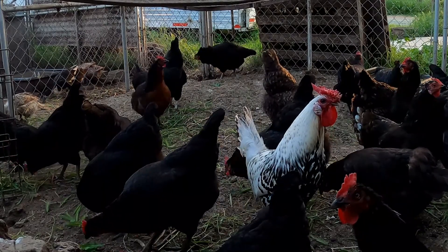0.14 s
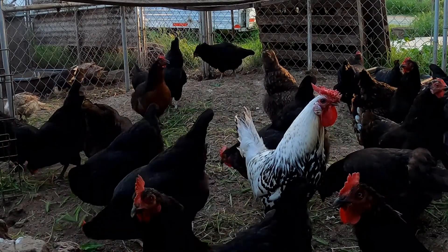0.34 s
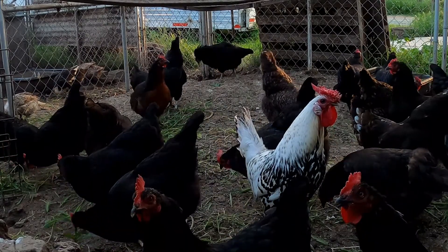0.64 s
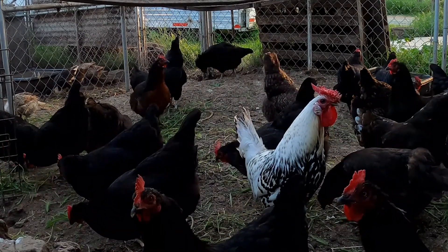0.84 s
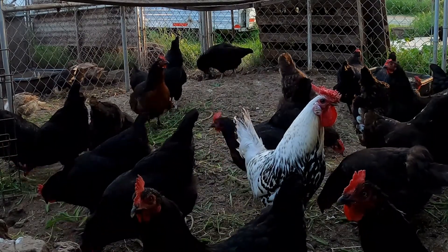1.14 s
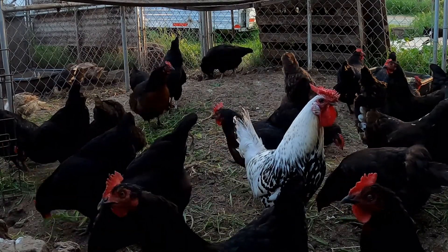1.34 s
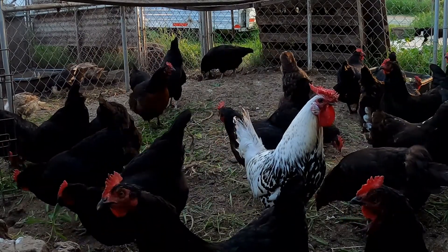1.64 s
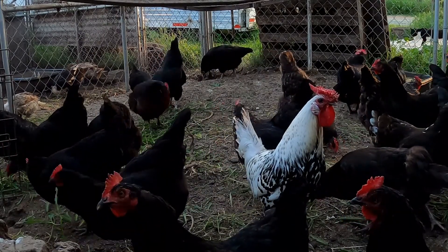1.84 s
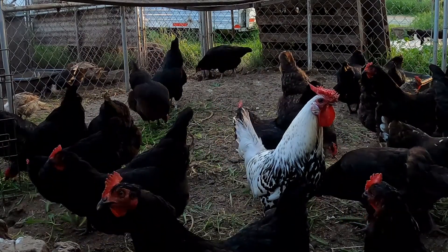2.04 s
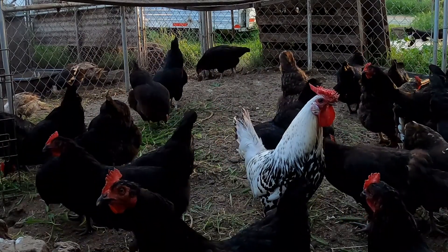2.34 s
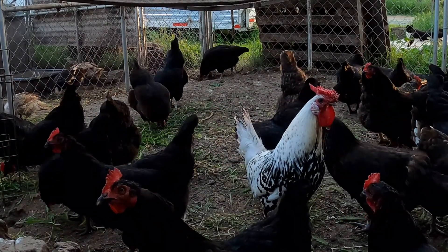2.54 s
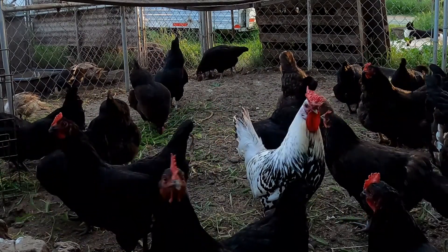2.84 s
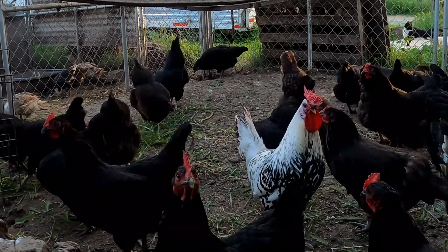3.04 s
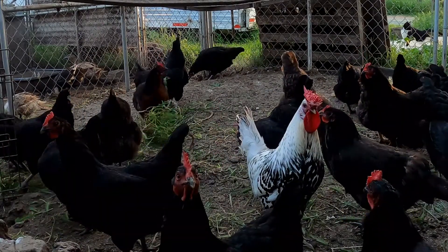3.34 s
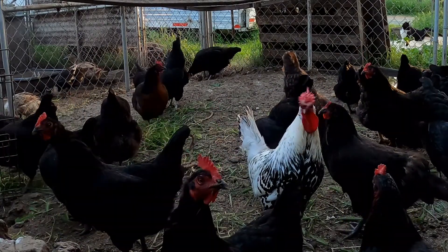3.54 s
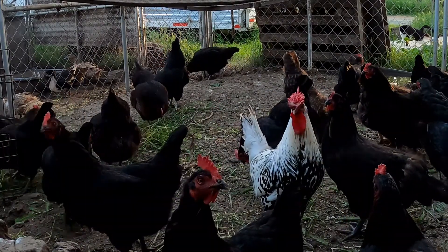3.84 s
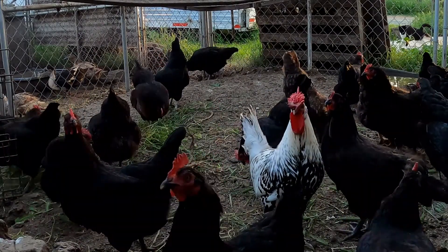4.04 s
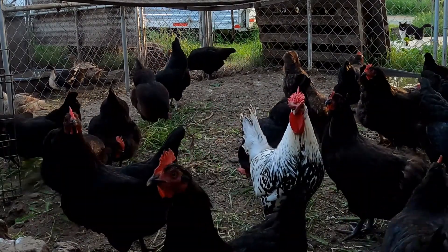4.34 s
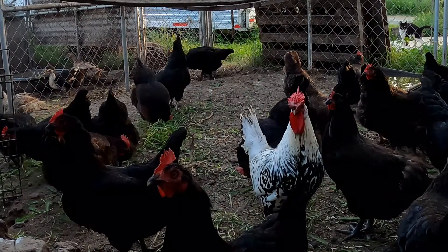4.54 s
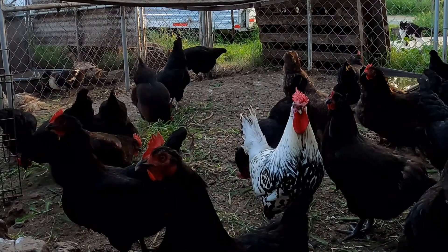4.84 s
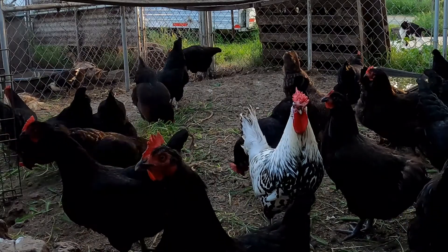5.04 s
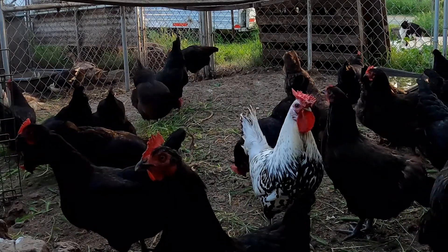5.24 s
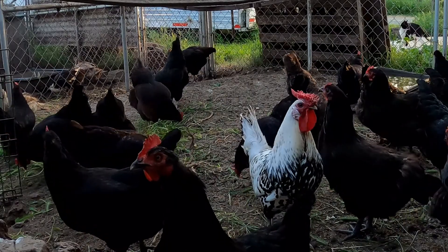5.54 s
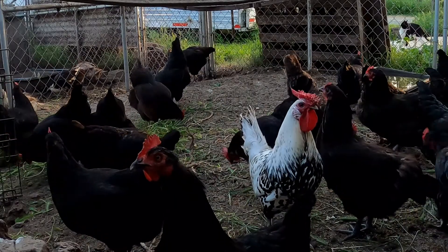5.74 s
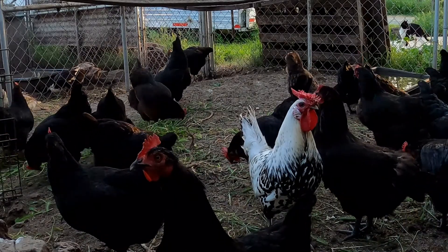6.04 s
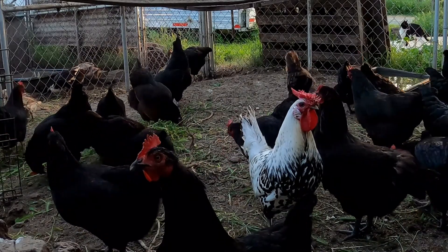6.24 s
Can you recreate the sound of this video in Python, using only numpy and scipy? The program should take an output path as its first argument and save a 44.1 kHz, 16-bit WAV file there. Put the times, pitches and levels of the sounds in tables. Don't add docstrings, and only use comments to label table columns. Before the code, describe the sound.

An outdoor chicken pen heard through a nearby stereo microphone, with quiet far traffic, deep soft wind gusts and thin, high cricket chirps pulsing about three times a second throughout. At 0 s a hen is already moaning; the nasal tone rises slightly, swells around 0.6 s, turns rough and breaks off at about 0.8 s. Small straw snaps accompany it. From 1.3 to 2.5 s, claws drag through dry earth and beaks peck, with crisp crackles near 2 s. A quieter stretch follows. Three short dry clucks sound at roughly 3.4, 3.6 and 3.8 s, each stronger. After straw rustle and a peck at 4.3 s, a loud, harsh, very short bawk bursts out at 4.55 s, slightly left, with a brief reflection from the shed walls. From 5 s to the end near 6.4 s, only light pecks, snapping stalks, shuffling and a soft footfall at 6.2 s remain.

```python
import sys
import numpy as np
from scipy import signal
from scipy.fft import rfft, irfft, next_fast_len
from scipy.io import wavfile

SR = 44100
rng = np.random.default_rng(int(sys.argv[2]) if len(sys.argv) > 2 else 0)


def master_out(mix):
    frames = np.transpose(np.atleast_2d(mix))
    ceiling = np.clip(frames, -1, 1)
    pcm = np.round(ceiling * 32767).astype(np.int16)
    wavfile.write(sys.argv[1], SR, pcm)


def level_to_linear(level):
    exponent = np.asarray(level, float) / 20
    return 10 ** exponent


N = 281358

# (frequency [Hz], level [dB])
AIR_TONE = [(90, -8), (136, -6), (225, -7), (300, -17), (450, -21), (800, -31), (1270, -24.5), (3260, -29),
            (5530, -30), (8400, -34), (10000, -68), (15500, -80)]
# (frequency [Hz], likeness [0 to 1])
LIKENESS = [(30, .92), (90, .88), (180, .5), (500, .7), (1500, .5), (4000, .25), (12000, .15)]
# (frequency [Hz], level [dB per Hz])
WIND_TONE = [(22, -5), (42, -3.5), (60, 3), (85, -7), (130, -16)]
# (time [s], hold [s], level [dB])
GUSTS = [(0, .03, -59), (.16, .03, -59), (.4, .1, -53), (.66, .04, -57), (.95, .15, -56), (1.2, .08, -54),
         (1.6, .1, -60), (1.9, .1, -60), (2.22, .2, -52), (2.7, .1, -53), (2.95, .3, -55), (3.62, .45, -58),
         (4.3, .25, -58), (4.83, .06, -56), (5.22, .3, -57), (5.73, .1, -54), (5.95, .2, -59)]
# (start [s], end [s], level [dB])
CRICKET_CHIRPS = [(.12, .22, -67), (.52, .64, -67), (.8, .9, -67), (1.57, 1.68, -67), (1.82, 1.95, -65),
                  (2.11, 2.23, -65), (2.52, 2.63, -66), (2.78, 2.87, -65), (3.05, 3.17, -64),
                  (3.29, 3.41, -64), (3.6, 3.74, -66), (3.99, 4.1, -66), (4.29, 4.43, -67),
                  (4.62, 4.7, -66), (4.86, 4.96, -67), (5.15, 5.26, -66), (5.42, 5.55, -65),
                  (5.72, 5.84, -64), (5.98, 6.08, -63), (6.26, 6.38, -63)]
# (start [s], end [s], frequency [Hz], width [Hz], level [dB])
FAR_INSECTS = [(1.32, 1.38, 5060, 70, -66), (1.47, 1.98, 5000, 80, -65), (2.0, 2.5, 4990, 90, -67.5),
               (.95, 1.15, 4830, 120, -75), (2.52, 2.76, 4830, 150, -77), (3.04, 3.14, 4980, 120, -69),
               (3.03, 3.15, 5400, 500, -71), (3.4, 3.47, 3350, 120, -67), (3.53, 3.72, 5250, 200, -70),
               (3.18, 3.36, 2150, 150, -73), (3.57, 3.72, 2170, 110, -72), (3.82, 4.03, 2140, 110, -70),
               (4.08, 4.2, 2050, 250, -72), (3.82, 4.02, 3850, 800, -67), (0, 6.38, 4250, 350, -78),
               (2.22, 2.3, 2900, 80, -72), (2.51, 2.6, 2850, 80, -73), (2.78, 2.9, 2850, 80, -74)]
# (time [s], hold [s], dull shuffle level [dB], bright crackle level [dB])
STIRS = [(0, .02, -75, -76), (.3, .04, -72, -73), (.62, .03, -75, -73), (.82, .03, -75, -79),
         (1.31, .02, -62, -72), (1.42, .03, -65, -72), (1.6, .06, -70, -71), (1.73, .08, -63, -70),
         (1.86, .03, -65, -68), (1.99, .1, -64, -70), (1.955, .01, -66, -58), (2.075, .02, -66, -58),
         (2.125, .012, -61, -72), (2.33, .1, -63, -71), (2.2, .06, -72, -74), (3.0, .08, -86, -76),
         (3.27, .16, -66, -66), (3.555, .1, -65, -67), (3.775, .1, -67, -72), (4.04, .13, -64, -61),
         (4.315, .015, -56, -65), (4.38, .08, -67, -68), (4.55, .04, -61, -63), (5.015, .01, -80, -68),
         (5.2, .06, -75, -73), (5.32, .03, -72, -67), (5.395, .02, -64, -75), (5.422, .012, -68, -60),
         (5.53, .015, -64, -61), (5.604, .015, -65, -64), (5.76, .03, -62, -64), (5.86, .17, -64, -65),
         (6.17, .2, -68, -80), (.55, .06, -80, -72), (.17, .04, -78, -74)]
# (frequency [Hz], level [dB per Hz])
SHUFFLE_TONE = [(700, -22), (1100, -3), (1800, -3), (2600, 0), (3800, -2), (5500, -8), (8000, -20)]
# (frequency [Hz], level [dB per Hz])
CRACKLE_TONE = [(2800, -15), (4000, -3), (5500, 0), (8350, -4), (10500, -15), (12400, -14), (15500, -38)]
# (time [s], peak level [dB], centre [Hz], left-right [dB])
SNAPS = [(0.1585, -59, 5460, -0.5), (0.2648, -53, 7850, 0.0), (0.3257, -48, 5700, 0.0),
         (0.625, -53, 7140, -0.5), (1.0016, -60, 8650, 0.0), (1.2414, -55, 5980, 2.0),
         (1.516, -51, 5890, 0.0), (1.5953, -51, 5670, -1.5), (1.6327, -51, 6310, 0.5),
         (1.9535, -40, 5900, 1.0), (2.0762, -38, 5730, -0.5), (2.9657, -58, 6770, -2.5),
         (3.0011, -58, 5670, -0.5), (4.0322, -51, 6320, -0.5), (4.0457, -49, 6080, 0.0),
         (5.0155, -51, 7800, 1.5), (5.3078, -54, 5990, 0.0), (5.3433, -49, 8390, 0.5),
         (5.4144, -46, 5990, 1.5), (5.5348, -49, 5690, 4.0), (5.6052, -46, 7790, 1.0),
         (5.7613, -47, 6240, 2.0), (5.8511, -47, 7910, 1.0), (6.1384, -56, 5470, 2.0),
         (6.3415, -51, 5520, -0.5)]
# (time [s], peak level [dB], centre [Hz], left-right [dB])
PECKS = [(0.0458, -38, 1670, 0.0), (0.08, -48, 2500, 0.0), (0.3257, -50, 3000, 0.0),
         (0.878, -52, 1120, -1.0), (4.3211, -42, 1700, 0.0), (1.3099, -41, 3160, 4.0),
         (1.3763, -54, 2080, 2.5), (1.4122, -46, 3110, 2.5), (1.722, -49, 2750, -1.0),
         (1.7659, -50, 2510, -2.0), (1.8084, -51, 1620, -1.0), (1.8534, -48, 2080, 2.0),
         (1.938, -43, 2250, 3.0), (2.0318, -45, 2840, 2.0), (2.1164, -43, 2240, 2.5),
         (2.3092, -51, 2180, -0.5), (2.3484, -49, 2430, -1.5), (2.4379, -51, 2760, 1.5),
         (2.4713, -52, 3640, 2.5), (3.2355, -56, 1380, 1.5), (3.4665, -50, 3520, -1.5),
         (4.2722, -54, 2010, 1.0), (4.3211, -37.5, 2940, -0.5), (4.3445, -41, 2090, -1.0),
         (4.4034, -45, 2200, 3.5), (4.4977, -54, 2910, 3.5), (5.3916, -52, 3430, 5.5),
         (5.4144, -51, 3860, 4.0), (5.6052, -50, 2850, 0.0), (5.7588, -45, 3590, 4.0),
         (5.8511, -46, 3560, 5.5), (5.9973, -51, 3300, 4.0), (6.0834, -54, 2460, 3.5),
         (6.1154, -47, 3100, 3.5)]
# (time [s], peak level [dB], centre [Hz], left-right [dB])
TICKS = [(1.0016, -60, 8650, -0.5), (1.3094, -57, 8000, 1.0), (1.4127, -57, 7260, -1.5),
         (1.5958, -50, 8170, -3.0), (1.9495, -52, 8100, -2.0), (1.9574, -49, 7000, 0.5),
         (2.0727, -53, 7030, -3.0), (2.0807, -50, 8670, -0.5), (2.6808, -61, 8130, -1.0),
         (3.483, -59, 9810, -0.5), (4.0322, -50, 8260, -0.5), (4.3211, -54, 7270, -1.5),
         (4.7197, -60, 7690, 2.0), (4.7341, -57, 7900, 0.5), (4.7805, -53, 6890, 1.5),
         (4.8065, -61, 6200, 0.5), (4.8389, -58, 5600, 0.5), (4.8389, -60, 2900, 0.5),
         (4.9492, -58, 7740, 0.5), (4.3177, -45, 2150, -2.5), (4.8843, -63, 8070, 0.0),
         (5.0155, -52, 7800, 1.0), (5.3433, -48, 8390, -0.5), (5.3921, -58, 7880, 0.0),
         (5.4196, -53, 7000, 0.5), (5.5214, -56, 7000, 1.0), (5.6052, -49, 7790, 1.0),
         (5.7503, -59, 7250, 0.0), (5.8516, -49, 7910, 0.5), (6.2941, -63, 8450, -0.5)]
# (time [s], peak level [dB], centre [Hz], left-right [dB])
SCUFFS = [(1.715, -50, 2700, -1.0), (1.72, -52, 1350, -1.0), (1.76, -50, 2550, -2.0),
          (1.775, -51, 1400, -1.0), (1.85, -50, 2850, 2.0), (1.938, -46, 2300, 3.0),
          (1.985, -52, 2400, 2.0), (2.03, -46, 2550, 2.0), (2.117, -46, 2350, 2.5), (2.33, -51, 1300, -0.5),
          (2.36, -52, 1250, -0.5), (2.345, -51, 2450, -1.5), (2.435, -53, 2500, 1.5),
          (1.325, -50, 3200, 4.0)]
# (time [s], peak level [dB], centre [Hz], left-right [dB])
THUD = [
    (6.196, -48, 330, 0),
]
# (time [s], pitch [Hz], level [dB])
MOAN = [
    (0.0, 370, -43.5),
    (0.384, 399.9, -39),
    (0.436, 410.6, -39),
    (0.494, 410.5, -37),
    (0.584, 426.6, -36),
    (0.692, 419.0, -36),
    (0.72, 418.6, -37),
    (0.814, 416.7, -38),
    (0.835, 420.6, -46),
]
# (time [s], half-pitch lines level [dB], rasp level [dB])
BREAK_UP = [
    (0, -26, -15),
    (.14, -22, -11),
    (.3, -18, -9),
    (.42, -11, -11),
    (.54, -8, -14),
    (.58, -5, -23),
    (.66, -6, -23),
    (.7, -10, -10),
    (.76, -7.5, -17),
]
# (frequency [Hz], level [dB])
MOAN_TONE = [(380, 0), (800, -23), (1130, -5), (1260, -9.5), (1650, -33), (2100, -25), (2600, -33),
             (3300, -27), (4200, -42)]
# (frequency [Hz], width [Hz], level [dB])
MOAN_PIPE = [(1040, 150, 0), (1500, 260, -13), (630, 150, -19), (3280, 450, -15), (2100, 500, -23),
             (4700, 600, -16), (6600, 400, -11)]
# (time [s], pulses [count], first gap [ms], last gap [ms], peak level [dB])
CLUCKS = [
    (3.3723, 3, 6.9, 6.4, -27.5),
    (3.5795, 3, 5.6, 6.5, -24),
    (3.7891, 4, 5.0, 5.5, -22.5),
]
# (frequency [Hz], width [Hz], level [dB])
CLUCK_THROAT = [(185, 70, -15), (580, 160, -8), (800, 160, -10), (1100, 110, -6), (1500, 220, -9),
                (2400, 600, -14), (3190, 220, -3), (4550, 220, -12)]
OPENING = (0.1, 0.4, 0.3, 1.2, -.5, -1.5, -.6, -.6)
# time [s], pulses [count], gap [ms], stumble [ms], peak level [dB]
BAWK = (4.5575, 10, 3.98, 1.2, -15.5)
# (frequency [Hz], width [Hz], level [dB])
BAWK_THROAT = [(237, 50, -24.5), (520, 120, -34), (760, 120, -33), (1030, 130, -22), (1600, 150, -5.5),
               (2060, 210, -2.5), (2850, 400, -9), (3850, 260, -12), (5100, 700, -6), (6600, 700, -6),
               (8200, 1500, 0), (11000, 2000, -2)]

LEFT_LAG = 2


def rms_one(x):
    return x / np.sqrt(np.mean(x ** 2) + 1e-20)


def at_hz(points, hz):
    return np.interp(np.log(hz), np.log(np.array(points)[:, 0]), np.array(points)[:, 1])


def drift(rate, size=N, db=None):
    step = 40
    r = np.exp(-2 * np.pi * rate * step / SR)
    slow = signal.lfilter([1], [1, -2 * r, r * r], rng.standard_normal(size // step + 2002))[2000:]
    slow = rms_one(slow - slow.mean())
    return np.interp(np.arange(size) / step, np.arange(len(slow)), slow if db is None else level_to_linear(db * slow))


def swells(rows, rest_db, rise_s, fall_s, slur):
    t = np.arange(0, N + 64, 64) / SR
    power = level_to_linear(2 * rest_db)
    for s, hold, db in rows:
        before = (s - t) / (rise_s + slur * hold)
        after = (t - s - hold) / (fall_s + slur * hold)
        power = power + level_to_linear(2 * (db - 20 * np.clip(np.maximum(before, after), 0, 9)))
    return np.interp(np.arange(N) / SR, t, np.sqrt(power))


def resonance(x, hz, width_hz):
    r = np.exp(-np.pi * width_hz / SR)
    top = (1 - r * r) / 2 * np.array([1, 0, -1])
    return signal.lfilter(top, [1, -2 * r * np.cos(2 * np.pi * hz / SR), r * r], x + 1e-18)


def soften(x, cut_hz):
    return signal.sosfilt(signal.butter(2, cut_hz, fs=SR, output="sos"), x + 1e-18)


def placed(x, pan_db):
    late = np.concatenate([np.zeros(LEFT_LAG), x[:-LEFT_LAG]])
    return np.array([late * level_to_linear(pan_db / 2), x * level_to_linear(-pan_db / 2)])


def banded_noise(spectrum, patchy_db, grain_db):
    out = np.zeros((3, N))
    edges = 20 * 2 ** np.arange(0, 10, .5)
    white = rng.standard_normal((2, 2, N)) * drift(150., db=grain_db) * drift(3., db=.6 * patchy_db)
    for k, (low, high) in enumerate(zip(edges, edges[1:])):
        hz = np.sqrt(low * high)
        if spectrum[0][0] < hz * 1.3 < spectrum[-1][0] * 1.5:
            band = signal.sosfilt(signal.butter(2, [low, high], "band", fs=SR, output="sos"), white[k % 2])
            alike = np.clip(at_hz(LIKENESS, hz), 0, 1)
            gain = level_to_linear(at_hz(spectrum, hz)) * drift(10., db=patchy_db)
            mid, side = gain * np.sqrt([[1 + alike], [1 - alike]]) * band
            out += [np.roll(mid, LEFT_LAG * (hz < 3000)), mid, side]
    return rms_one(np.array([out[0] + out[2], out[1] - out[2]]))


def open_air():
    return level_to_linear(-63) * banded_noise(AIR_TONE, patchy_db=1.5, grain_db=.3)


def wind():
    gusts = swells(GUSTS, rest_db=-67, rise_s=.12, fall_s=.12, slur=.2)
    return gusts * level_to_linear(1.2) * banded_noise(WIND_TONE, patchy_db=1.5, grain_db=.3)


def insects():
    near_throbs, far_throbs, throb_depth = 54, 25, .3
    rise_hz, fade_s, swell_db = 55, .018, 2.5
    out = np.zeros((2, N))
    hiss = rng.standard_normal((2, N))
    strokes = []
    for start, end, db in CRICKET_CHIRPS:
        strokes.append((start, end, 4520, 140, db - 2.2, near_throbs, rise_hz))
        strokes.append((start - .02, end, 4270, 200, db - 6.5, near_throbs, rise_hz))
    strokes += [(*row, far_throbs, 0) for row in FAR_INSECTS]
    for start, end, hz, width_hz, db, throbs, bend_hz in strokes:
        at = np.arange(max(round((start - .03) * SR), 0), min(round((end + .03) * SR), N))
        t = at / SR
        tone = resonance(resonance(hiss[:, at], hz, width_hz), hz, width_hz)
        along = (t - (start + end) / 2) / (end - start)
        bend = np.exp(2j * np.pi * np.cumsum(bend_hz * along) / SR)
        tone = (signal.hilbert(tone, next_fast_len(len(at)))[:, :len(at)] * bend).real
        beat = 1 + throb_depth * np.sin(2 * np.pi * throbs * t)
        fade = np.clip(np.minimum(t - start, end - t) / fade_s + 1, 0, 1)
        fade *= level_to_linear(swell_db * (np.clip((t - start) / (end - start), 0, 1) - .6))
        out[:, at] += level_to_linear(db) * fade * rms_one((tone[0] + .6 * tone[1] * [[1], [-1]]) * beat)
    return out


def straw():
    stirs = np.array(STIRS)
    dull = swells(stirs[:, [0, 1, 2]], rest_db=-86, rise_s=.015, fall_s=.04, slur=.5)
    bright = swells(stirs[:, [0, 1, 3]], rest_db=-91, rise_s=.015, fall_s=.04, slur=.5)
    shuffle = dull * banded_noise(SHUFFLE_TONE, patchy_db=3.0, grain_db=2.5)
    crackle = bright * banded_noise(CRACKLE_TONE, patchy_db=2.5, grain_db=2.5)
    return shuffle + level_to_linear(-2.5 * np.array([[.5], [-.5]])) * crackle


def scratches(rows, decay_s, sharpness, click_db, rise_s):
    out = np.zeros((2, N + SR))
    t = np.arange(SR // 10) / SR
    for s, db, hz, pan_db in rows:
        grit = rng.standard_normal((2, len(t)))
        grit = (grit[0] + .6 * grit[1] * [[1], [-1]]) * np.minimum(t / rise_s + .3, 1)
        grit[:, 0] += level_to_linear(click_db)
        decay = decay_s * level_to_linear(.3 * (db + 50))
        burst = grit * level_to_linear(-60 * np.maximum(t - rise_s, 0) / decay)
        burst = resonance(resonance(burst, hz, hz / sharpness), hz, 1.5 * hz / sharpness)
        at = round(s * SR)
        sides = level_to_linear(db + np.array([[pan_db / 2], [-pan_db / 2]]))
        out[:, at:at + len(t)] += burst / np.abs(burst).max() * sides
    return out[:, :N]


def feet_and_beaks():
    out = scratches(SNAPS, .035, sharpness=3.3, click_db=12, rise_s=.004)
    out += level_to_linear(-.7) * scratches(PECKS, .035, sharpness=3.4, click_db=16, rise_s=.002)
    out += level_to_linear(-1.5) * scratches(TICKS, .01, sharpness=2.5, click_db=18, rise_s=.0003)
    out += level_to_linear(-1.5) * scratches(SCUFFS, .11, sharpness=2.8, click_db=3.0, rise_s=.018)
    return out + scratches(THUD, .08, sharpness=1.5, click_db=12, rise_s=.004)


def yard(x):
    t60_s, wall_cut_hz, wall_leak_hz = .28, 6000, 450
    echo_s = np.geomspace(.006, .055, 12) * rng.uniform(.9, 1.1, 12)
    size = next_fast_len(N + SR)
    hz = np.arange(size // 2 + 1) * SR / size
    sound = rfft(x, size) * hz ** 2 / (hz ** 2 + wall_leak_hz ** 2)
    out = np.zeros((2, len(hz)), complex)
    for k, lag in enumerate(echo_s):
        loop = level_to_linear(-60 * lag / t60_s) * np.exp(-2j * np.pi * hz * lag) / (1 + 1j * hz / wall_cut_hz)
        out[k % 2] += loop / (1 - loop) * (-1) ** (k // 2)
    return irfft(out * sound, size)[:, :N]


def throat(pulses, modes, flip=-1):
    pulses = pulses + 1e-9 * rng.standard_normal(len(pulses))
    out = 0
    for k, (hz, width, db) in enumerate(modes):
        out = out + flip ** k * level_to_linear(db) * SR / (np.pi * width) * resonance(pulses, hz, width)
    return out


def breathy(pulses, decay_s, breath_db):
    tail = np.exp(-np.arange(SR // 10) / (decay_s * SR))
    puff = signal.oaconvolve(np.abs(pulses), tail)[:len(pulses)]
    return pulses + level_to_linear(breath_db) * puff * rng.standard_normal(len(pulses))


def moan():
    t = np.arange(SR) / SR
    s, pitches, levels = np.transpose(MOAN)
    pitch, level_db = np.interp(t, s, pitches), np.interp(t, s, levels)
    s, halves, rasps = np.transpose(BREAK_UP)
    halves_db, rasp_db = np.interp(t, s, halves), np.interp(t, s, rasps)
    upper_db = np.interp(level_db, [-44.0, -36.0], [-11.0, -1.5])
    cycles = np.cumsum(pitch * (1 + .008 * drift(40., size=SR))) / SR
    tones = 0
    for k in range(1, 11):
        db = at_hz(MOAN_TONE, k * pitch) + upper_db * (k > 3)
        db = db - .8 * (upper_db + 4.0) * (k == 2)
        wave = np.cos(2 * np.pi * k * cycles - np.pi * (k > 2))
        tones = tones + level_to_linear(db) * drift(30., size=SR, db=.4 + .55 * k) * wave
    count = cycles.astype(int)
    starts = np.diff(count, prepend=0) > 0
    alternate = starts * (-1.) ** count
    alternate = resonance(alternate, *MOAN_PIPE[0][:2]) + level_to_linear(-12) * alternate
    half_pitch = rms_one(soften(throat(alternate, MOAN_PIPE), cut_hz=2500))
    rasp = rms_one(soften(throat((starts + .12) * rng.standard_normal(SR), MOAN_PIPE), cut_hz=3500))
    voice = level_to_linear(level_db + 2.2) * np.clip((MOAN[-1][0] - t) / .012, 0, 1)
    rough = level_to_linear(halves_db) * drift(20., size=SR, db=1.5) * half_pitch + level_to_linear(rasp_db) * rasp
    call = placed(voice * np.sqrt(2) * tones, -.9) + placed(voice * rough, -3.5)
    return np.pad(call, [(0, 0), (0, N - SR)])


def clucks():
    out = np.zeros(N)
    for s, count, first_ms, last_ms, db in CLUCKS:
        count = round(count)
        order = np.arange(count)
        effort = db + 23
        pulses = np.zeros(SR // 5)
        at = .0043 + np.cumsum([0, *np.linspace(first_ms, last_ms, count - 1)]) / 1000
        pulses[np.round(at * SR).astype(int)] += level_to_linear(db - 7 - .8 * order)
        rebound_at = at + np.linspace(.0019, .0029, count)
        rebound_db = db - 15.5 + 1.9 * effort + 1.5 * (order - 1.5)
        pulses[np.round(rebound_at * SR).astype(int)] += level_to_linear(rebound_db)
        pulses[0] += level_to_linear(db - 15)
        modes = [(hz, width, level + gain * effort) for (hz, width, level), gain in zip(CLUCK_THROAT, OPENING)]
        call = throat(breathy(pulses, decay_s=.005, breath_db=-30), modes, flip=1)
        for cut_hz in (3500, 3900, 3700):
            call = soften(call, cut_hz)
        start = round((s - at[0]) * SR)
        out[start:start + len(call)] += call
    return out


def bawk():
    s, count, gap_ms, stumble_ms, db = BAWK
    order = np.arange(round(count))
    stumble = stumble_ms * np.exp(-((order[:-1] - 5.0) / .9) ** 2)
    gaps = gap_ms + .45 * (order[:-1] == 0) + stumble
    at = np.round(np.cumsum([0, *gaps]) / 1000 * SR).astype(int)
    fade_db = 1.2 * np.clip(order - 4, 0, None) + 6.0 * np.clip(order - 7, 0, None)
    heights = level_to_linear(db - 3 - 4.0 * (order == 0) - fade_db + rng.normal(0, .6, len(order)))
    t = np.arange(SR // 4) / SR
    call = 0
    for k, sink in enumerate(np.linspace(1, .94, len(order))):
        pulse = heights[k] * (np.arange(len(t)) == at[k])
        modes = [(hz * (sink if hz > 1200 else 1), width, level) for hz, width, level in BAWK_THROAT[:8]]
        puff = -breathy(pulse, decay_s=.005, breath_db=-32)
        call = call + throat(soften(soften(puff, cut_hz=2600), cut_hz=4500), modes)
    from_peak = t - .016
    swell = np.exp(-np.where(from_peak < 0, (from_peak / .012) ** 2, from_peak / .022))
    throb = 1 + .6 * np.cos(2 * np.pi * (t - .001) * 1000 / gap_ms)
    air = swell * throb * rng.standard_normal(len(t))
    call = call + level_to_linear(-48.5) * rms_one(throat(soften(air, cut_hz=3500), BAWK_THROAT[7:]))
    return np.pad(call, (round(s * SR), N))[:N]


def scene():
    background = open_air() + wind() + insects()
    ground = straw() + feet_and_beaks()
    long_call, dry_calls, loud_call = moan(), clucks(), bawk()
    echoes = yard(level_to_linear(-27) * long_call[0] + level_to_linear(-20.5) * dry_calls + level_to_linear(-15.5) * loud_call)
    birds = long_call + placed(dry_calls, -1.2) + placed(loud_call, 4.2) + echoes
    return background + ground + birds


def band_limit(x):
    return signal.sosfilt(signal.butter(12, 15520, fs=SR, output="sos"), x)


def record(dry):
    return band_limit(dry)


dry = scene()
out = record(dry)
master_out(out)
```